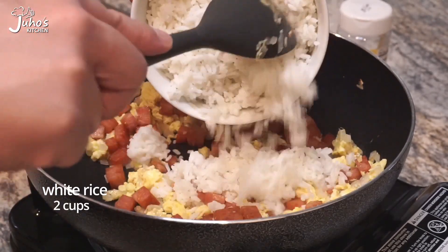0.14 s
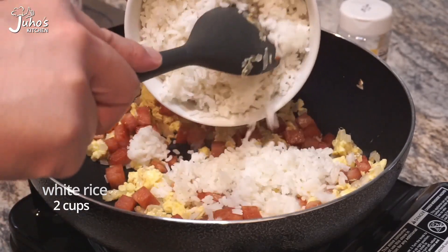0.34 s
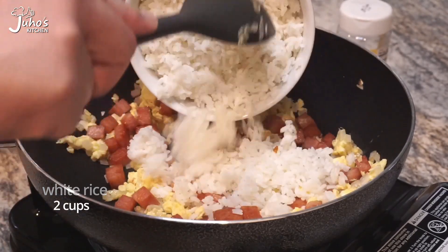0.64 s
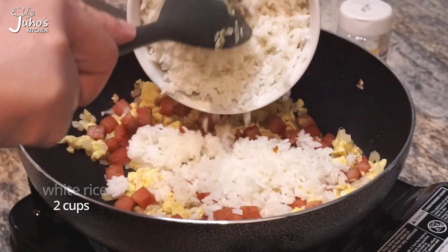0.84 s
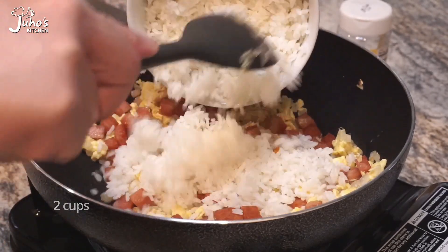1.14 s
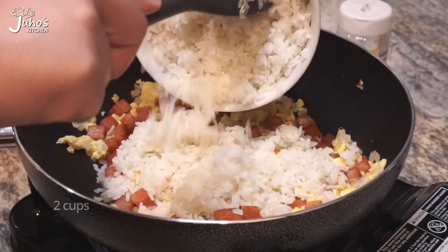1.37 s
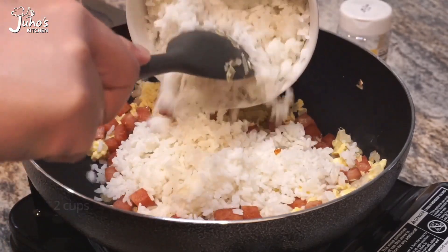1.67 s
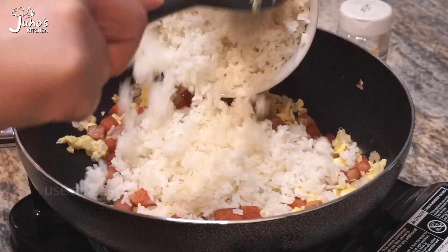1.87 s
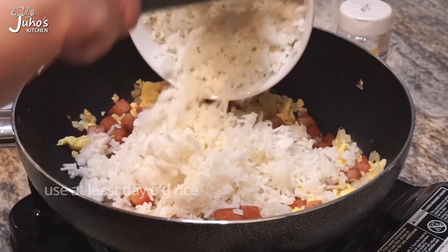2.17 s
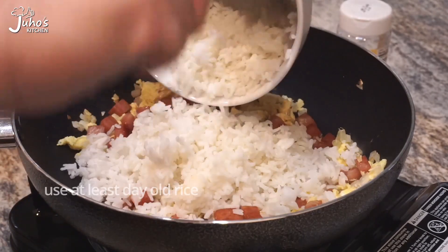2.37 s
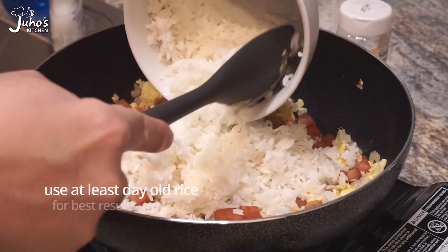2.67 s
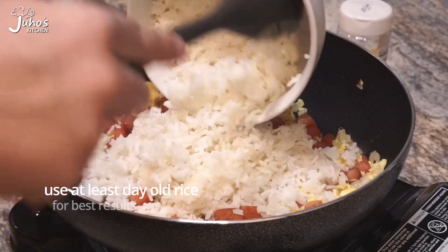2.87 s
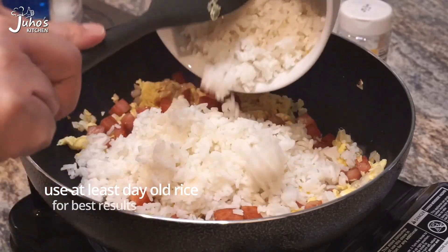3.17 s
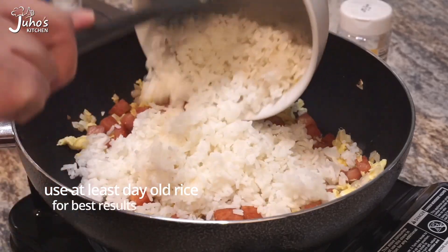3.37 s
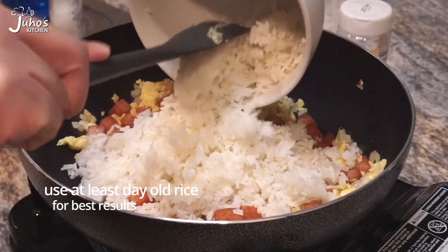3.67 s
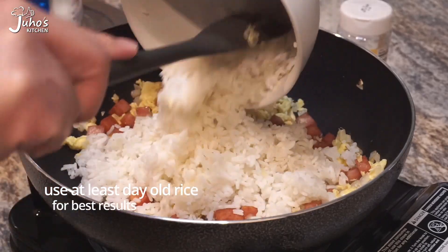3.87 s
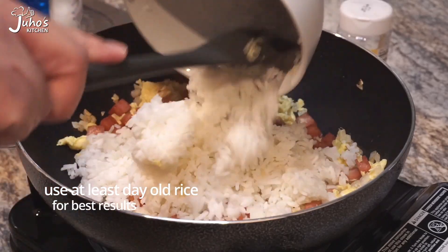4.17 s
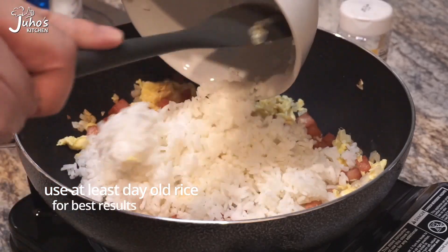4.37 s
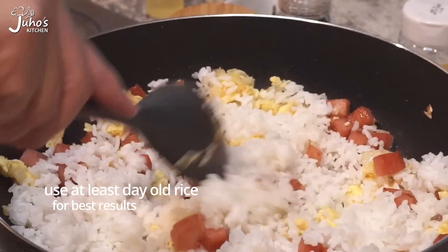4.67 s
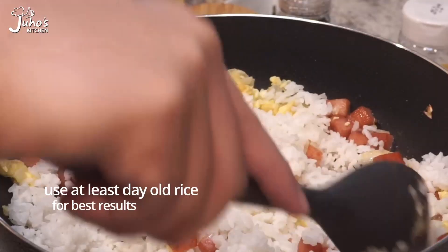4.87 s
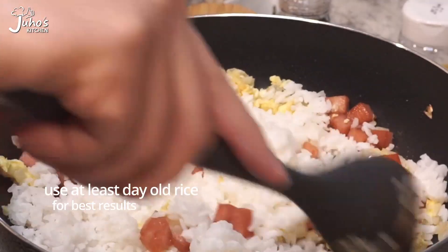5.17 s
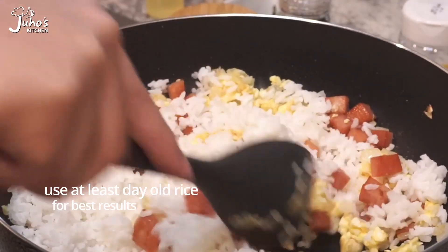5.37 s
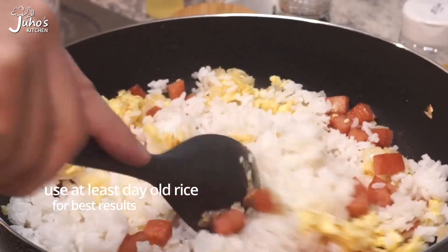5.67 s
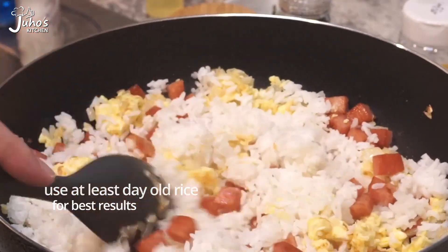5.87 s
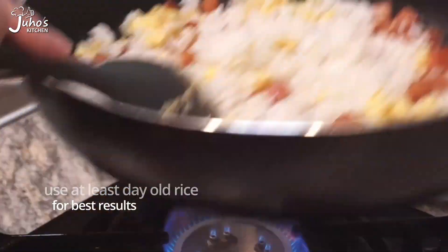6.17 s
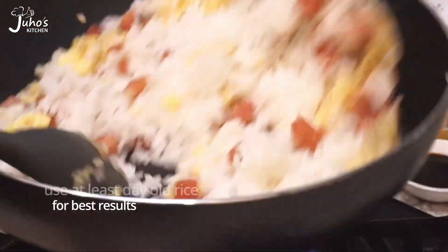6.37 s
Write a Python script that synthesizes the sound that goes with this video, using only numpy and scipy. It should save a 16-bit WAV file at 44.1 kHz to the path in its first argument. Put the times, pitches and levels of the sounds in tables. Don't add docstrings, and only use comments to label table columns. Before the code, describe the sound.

Food sizzles and crackles in a wok on a gas flame, popping oil, then hisses louder as it is turned, with sharp spatula knocks near the end.

```python
import sys
import numpy as np
from scipy import signal
from scipy.fft import rfft, irfft, next_fast_len
from scipy.io import wavfile

SR = 44100
rng = np.random.default_rng(int(sys.argv[2]) if len(sys.argv) > 2 else 0)


def ratio(d):
    e = np.asarray(d, float) / 20
    return 10 ** e


def wav_record(signal):
    frames = np.transpose(np.atleast_2d(signal))
    bounded = np.clip(frames, -1, 1)
    quanta = np.round(bounded * 32767).astype(np.int16)
    wavfile.write(sys.argv[1], SR, quanta)


N = 287532
TURN_S = 4.64

# frequency_hz, density_db
FIZZ_SPECTRUM = [(880, -34), (1500, -2), (1900, 0), (2590, -3), (3530, -0.5), (6600, 0.5), (8780, -1.5),
                 (10500, -12.5), (13600, -30), (22000, -120)]
# frequency_hz, density_db
SIMMER_SPECTRUM = [(240, -29), (400, -12), (611, -1), (774, -3), (1140, 6), (1700, -6), (2210, -16),
                   (3740, -120)]
# frequency_hz, density_db
SPRAY_SPECTRUM = [(5600, -21), (9500, -4), (10800, -6.5), (13000, 0), (15000, -0.5), (17000, -2)]
# centre_hz, width_hz, boost_db
BOWL_RESONANCES = [
    (571, 210, 4.5),
    (1160, 180, 0.5),
    (2543, 620, 5.5),
    (6700, 720, 2.5),
]


def sizzle():
    t = np.arange(N) / SR
    turned = t > TURN_S
    stroke_db = stroke_swells()
    swing_db = stroke_db + 6.5 * turned
    crackle = bursts(per_s=1500, spread_db=3.0, cycles=5.4, clump_db=3.0, splutter_db=9.5, most_db=17)
    hiss = rng.standard_normal(N) * ratio(0.86 * drift(6))

    fizz = colour(hiss + ratio(-2.5) * crackle, FIZZ_SPECTRUM, BOWL_RESONANCES)
    simmer = colour(hiss + ratio(-2.5) * crackle, SIMMER_SPECTRUM, BOWL_RESONANCES)
    spray = colour(hiss + ratio(-0.5) * crackle, SPRAY_SPECTRUM, [(11700, 500, 3.5)])

    toss_db = -8 * np.exp(-((t - 6.25) / .08) ** 2)
    spray = spray - (1 - ratio(toss_db)) * band(spray, 10000, 18000)

    fizz_db = -49 + swing_db
    simmer_db = -58.5 - 0.06 * t + 0.71 * swing_db
    spray_db = -54 - 0.56 * t + 10 * turned + stroke_db
    return ratio(fizz_db) * fizz + ratio(simmer_db) * simmer + ratio(spray_db) * spray


# centre_s, swell_db, half_width_s
STROKES = [(.8, -1, 0.38), (1.35, 0, 0.43), (1.18, 3, .03), (1.57, 1.5, 0.043), (2.17, 2, 0.02),
           (3.1, -2, 0.048), (3.8, -0.5, 0.22), (4.73, 3, 0.041), (4.86, 5, 0.072), (4.96, 4.5, 0.055),
           (5.09, 4, 0.039), (5.25, 4, 0.095), (5.54, 6, .07), (5.77, 4.5, 0.038), (5.85, 3, 0.048),
           (5.97, 2.5, 0.11), (6.19, 4, 0.046), (6.29, -4, 0.043), (6.37, -1, 0.054), (6.52, 4, 0.064)]


def stroke_swells():
    t = np.arange(N) / SR
    return sum(db * np.exp(-((t - centre_s) / half_s) ** 2) for centre_s, db, half_s in STROKES)


def bursts(per_s, spread_db, cycles, clump_db, splutter_db, most_db):
    sizes = ratio(spread_db * np.minimum(rng.exponential(1, N), 3)) * rng.choice([-1, 1], N)
    crowding_db = np.minimum(clump_db * drift(12) + splutter_db * drift(90), most_db)
    born = rng.random(N) < per_s * ratio(crowding_db) / SR
    clicks = sizes * born
    pitches_hz = np.geomspace(450, 17000, 18)
    dealt = rng.integers(0, 18, N)
    out = np.zeros(N)
    for k, hz in enumerate(pitches_hz):
        out += hz ** 0.9 * ring(clicks * (dealt == k), hz, cycles / hz)
    return rms_one(out)


def pops():
    ms = np.arange(round(.014 * SR)) * 1000 / SR
    rows = all_pops()
    splatters = rng.standard_normal((len(rows), len(ms))) ** 3
    out = np.zeros(N + len(ms))
    for (start_s, bowl_db, thump_db, spray_db, hz, length_ms), splatter in zip(rows, splatters):
        kicks = splatter * np.exp(-(ms / (1.4 * length_ms)) ** 2) * length_ms * .27
        kicks[0] = 3
        bowl = per_ms(band(kicks, 1900, 3200))
        thump = per_ms(band(kicks, 650, 1750))
        skin = per_ms(band(kicks, hz / 1.34, hz * 1.3))
        spray = skin + ratio(-1.0) * per_ms(band(kicks, 3100, 2.23 * hz))
        spray = per_ms(spray)
        pop = ratio(bowl_db - 2.26) * bowl - ratio(thump_db + 1.0) * thump - ratio(spray_db + 0.15) * spray
        out[round(start_s * SR):][:len(ms)] -= pop
    return out[:N]


# start_s, bowl_db, spray_db, spray_hz
ROUND_POPS = [(.1402, -32.5, -31.5, 6700), (0.2728, -32.5, -34, 7000), (0.3642, -35, -38, 5200),
              (0.6917, -34, -32, 8300), (1.1507, -38.5, -35.5, 8100), (1.6089, -33.5, -44, 4600),
              (1.6931, -42, -29, 8000), (2.4487, -41, -33.5, 4500), (2.4888, -36, -45, 6200),
              (3.0161, -34.5, -39, 6900), (3.2563, -30, -37.5, 7800), (3.3912, -30, -33.5, 4300),
              (3.483, -34, -31.5, 4600), (3.5534, -40, -36, 5500), (3.9448, -39, -38, 6400),
              (4.0952, -36.5, -34, 7900), (4.4429, -47, -37, 10000), (4.4726, -37, -40, 6800),
              (4.4828, -37, -42, 6900), (4.5993, -32, -40, 4000), (4.7976, -34.5, -28.5, 5500),
              (4.8605, -35, -32, 4500), (4.9494, -35, -34, 4000), (5.1807, -34.5, -35, 6100),
              (5.2506, -32, -27, 6900), (5.4965, -34, -30.5, 7800), (5.516, -37, -33, 7600),
              (5.6529, -33, -35, 6300), (5.8946, -18, -23, 5740), (6.0352, -38, -27.5, 6900)]
# start_s, thump_db, spray_db, spray_hz
DEEP_POPS = [(.4377, -39, -36, 6600), (1.0429, -38.5, -31.5, 6400), (1.3013, -41, -37.5, 4700),
             (1.3062, -39, -38, 5100), (1.4845, -45, -35, 8300), (1.8099, -40.5, -38, 6900),
             (1.8728, -37.5, -44, 7600), (1.8797, -45, -32.5, 6900), (1.8897, -36.5, -34.5, 7600),
             (2.0739, -39.5, -29.5, 7000), (2.243, -36.5, -29.5, 5500), (2.3351, -41.5, -35, 6600),
             (2.607, -46, -29.5, 7800), (2.8086, -34, -31, 5400), (2.8428, -42, -38, 4200),
             (2.9328, -37.5, -33, 6800), (3.3407, -38, -36, 7250), (3.3567, -47, -45, 6100),
             (3.6423, -39.5, -34.5, 4100), (4.2159, -42, -34, 7000), (4.5547, -42.5, -39, 7800),
             (4.7548, -50, -28.5, 6000), (5.0695, -37.5, -29, 8400), (5.1143, -32, -25, 7000),
             (5.4428, -40, -30.5, 5200), (5.4779, -41, -33, 8500), (6.09, -50, -33, 6900),
             (6.2118, -35.5, -38, 6300)]
# start_s, bowl_db, spray_db, spray_hz, length_ms
SPLUTTERS = [(.238, -54, -35.5, 7500, 2.1), (.6264, -40, -43, 4200, 1.3), (1.9424, -29, -33.5, 4700, 1.5),
             (2.2784, -46, -36, 5200, 1.7), (2.5172, -36, -36.5, 6500, 1.2), (2.6137, -46, -36, 6700, 1.7),
             (4.1402, -33.5, -37.5, 6300, 1.9), (4.1454, -40, -40, 9300, 2.4),
             (4.4141, -30.5, -28, 4870, 2), (4.6597, -45, -31, 6800, 1.7), (4.6799, -28, -29, 6600, 1.4),
             (4.7841, -48, -33, 5400, 2), (4.8785, -26.5, -29, 6900, 1.5), (5.3471, -34.5, -29, 8800, 2.2),
             (5.7715, -35, -29, 5200, 1.6), (5.8475, -25.5, -28, 6800, 6.3), (5.8522, -30, -34, 7900, 2),
             (6.0186, -30, -30.5, 7100, 1.1)]
# start_s, spray_db, spray_hz
TICKS = [(.1901, -40, 6700), (0.2225, -37, 7100), (0.5667, -39, 5500), (1.366, -35, 7700),
         (1.3903, -33, 7200), (1.7385, -36.5, 6100), (1.868, -35, 8500), (2.0066, -37, 7800),
         (2.2281, -38, 8200), (2.2534, -35, 7600), (2.342, -34.5, 7000), (2.5496, -36, 6300),
         (2.6541, -36, 6600), (2.7945, -37, 7600), (2.9914, -41, 9800), (3.1652, -35.5, 6900),
         (3.3075, -40, 6800), (3.4383, -36, 8200), (3.6054, -36, 8950), (3.6548, -39, 4800),
         (3.9096, -35.5, 6800), (4.0234, -35, 7000), (4.2227, -36.5, 8800), (4.5209, -37, 9200),
         (4.775, -32, 6400), (4.9849, -32, 8600), (5.1343, -30, 6300), (5.4493, -33, 6000),
         (5.983, -32, 7100), (6.1038, -32.5, 6800)]


def all_pops():
    strays_per_s, stray_db, tick_ms = 4.5, -40, .4
    strays = rng.random((round(strays_per_s * N / SR), 4))
    rows = [(s, db, db - 7.5, top, hz, .4) for s, db, top, hz in ROUND_POPS]
    rows += [(s, db - 5.5, db, top, hz, .55) for s, db, top, hz in DEEP_POPS]
    rows += [(s, db, db - 11.5, top, hz, ms) for s, db, top, hz, ms in SPLUTTERS]
    rows += [(s, top - 16, top - 21, top, hz, tick_ms) for s, top, hz in TICKS]
    rows += [(when * N / SR, stray_db - 16 * a, stray_db - 7 - 14 * b, stray_db, 4400 + 4000 * c, tick_ms)
             for when, a, b, c in strays]
    return rows


# start_s, peak_db, rub_s, spot_hz (place struck), grating_db
KNOCKS = [(.545, -42, 0.0051, 626, -10), (.574, -44, .006, 626, -10), (.669, -42, 0.0009, 1000, -1.5),
          (1.300, -38, 0.0028, 1100, -10), (1.871, -39.5, 0.0042, 700, -8), (5.539, -28.5, 0.0025, 700, -2),
          (5.848, -31, .02, 404, 4), (.63, -44, 0.0069, 590, -10), (.70, -46, 0.012, 590, -10),
          (.79, -48.5, .01, 590, -10), (1.05, -44.5, 0.012, 590, -10), (1.315, -46, 0.0073, 550, -8),
          (1.98, -43.5, 0.0079, 604, -2), (1.21, -49, .02, 600, -8), (2.745, -45, .004, 900, -6),
          (5.64, -43, 0.028, 590, -8), (5.778, -33, 0.017, 260, 3), (5.85, -34.5, 0.033, 198, 4),
          (5.7766, -22.5, .003, 1190, -4), (5.7763, -27.5, 0.0031, 513, -7),
          (5.800, -34.5, 0.0082, 700, -7), (5.842, -26.5, 0.0063, 696, 2), (5.856, -28, 0.011, 990, 1),
          (5.895, -29, .004, 383, -6)]
# frequency_hz, level_db, t60_s
WOK_MODES = [(290, -3, .1), (400, -8, .06), (510, -1, .07), (590, -1, .11), (700, -3, .05), (830, -4, .05),
             (1000, -1, .07), (1150, 2, .1), (1580, -1, .06), (2000, -1, .04), (2340, -1, .05),
             (2620, -3, .04)]


def knocks():
    t = np.arange(round(.2 * SR)) / SR
    out = np.zeros(N + SR)
    grits = rng.standard_normal((len(KNOCKS), len(t)))
    for (start_s, peak_db, rub_s, spot_hz, grating_db), grit in zip(KNOCKS, grits):
        touch = grit * np.exp(-t / max(rub_s, .0005))
        sound = ratio(grating_db + 4) * band(touch, 0.17 * spot_hz, 1.9 * spot_hz)
        for hz, level_db, t60_s in WOK_MODES:
            mode = ring(touch, hz, t60_s)
            octaves_away = abs(np.log2(hz / spot_hz))
            sound += ratio(level_db - 8 * octaves_away) * mode / np.max(np.abs(mode))
        low_hz = spot_hz * 0.53
        sound = band(band(sound, low_hz, 9000), low_hz, 16000)
        out[round(start_s * SR):][:len(t)] += ratio(peak_db - 8) * sound
    return out[:N]


# start_s, length_s, pitch_hz, level_db
SQUEAKS = [
    (.556, .02, 5500, -46),
    (.622, .016, 4100, -50),
]


def squeak():
    t = np.arange(N) / SR
    out = np.zeros(N)
    for start_s, length_s, hz, db in SQUEAKS:
        swell = np.sin(np.pi * np.clip((t - start_s) / length_s, 0, 1)) ** 2
        out += ratio(db) * swell * np.sin(2 * np.pi * hz * t)
    return out


# frequency_hz, density_db
FLAME_SPECTRUM = [(53, -36), (90, -0.5), (182, -3), (237, -2.5), (444, -13), (524, -12.5), (600, -17),
                  (780, -33), (1320, -120)]
# frequency_hz, density_db
GUST_SPECTRUM = [(8.8, -17), (15, 2), (38, 1.5), (70, -2), (130, -10.5), (170, -30), (290, -120)]
# time_s, level_db
DRAUGHT = [(0.0, -52.5), (1.0, -64), (1.16, -49.5), (1.61, -65), (2.12, -54), (2.42, -64.5), (4.59, -62),
           (4.65, -47), (4.74, -55.5), (5.01, -50), (5.12, -65), (5.19, -41), (5.28, -52.5), (5.79, -53.5),
           (5.87, -40), (6.08, -56.5), (6.5, -58.5), (6.52, -71)]


def flame():
    t = np.arange(N) / SR
    roar = ratio(-61.5 + 2 * (t > TURN_S)) * colour(rng.standard_normal(N), FLAME_SPECTRUM)
    gusts = colour(rng.standard_normal(N), GUST_SPECTRUM, [(67, 8.2, 11.6)])
    times_s, levels_db = np.transpose(DRAUGHT)
    return roar + ratio(np.interp(t, times_s, levels_db)) * gusts


# delay_s, level_db
RIM_ECHOES = [
    (.00045, -36.5),
    (.0009, -47),
    (.0016, -18),
    (.0042, -23.5),
    (.0065, -33),
]


def rim(x):
    out = x.copy()
    sign = -1
    for delay_s, db in RIM_ECHOES:
        lag = round(delay_s * SR)
        out[lag:] += sign * ratio(db) * x[:N - lag]
        sign = -sign
    return out


def kitchen(x):
    t = np.arange(round(.4 * SR)) / SR
    dulled = signal.lfilter([1], [1, -.5], rng.standard_normal(len(t)))
    tail = dulled * ratio(-60 * t / 0.26) * (t > .003)
    return signal.fftconvolve(x, tail / np.sqrt(np.sum(tail ** 2)))[:N]


def rms_one(x):
    return x / np.sqrt(np.mean(x ** 2) + 1e-20)


def per_ms(x):
    return x * np.sqrt(SR / 1000 / np.sum(x ** 2))


def drift(rate_hz):
    r = np.exp(-2 * np.pi * rate_hz / SR)
    return rms_one(signal.lfilter([1], [1, -2 * r, r * r], rng.standard_normal(N + SR))[SR:])


def band(x, low_hz, high_hz):
    edges_hz = [low_hz, min(high_hz, .45 * SR)]
    return signal.sosfilt(signal.butter(2, edges_hz, "band", fs=SR, output="sos"), x)


def ring(clicks, hz, t60_s):
    r = ratio(-60 / (t60_s * SR))
    w = 2 * np.pi * hz / SR
    return signal.lfilter([0, np.sin(w)], [1, -2 * r * np.cos(w), r * r], clicks + 1e-18)


def colour(x, spectrum, peaks=()):
    size = next_fast_len(N + SR)
    hz = np.maximum(np.arange(size // 2 + 1) * SR / size, 1)
    points_hz, points_db = np.transpose(spectrum)
    db = np.interp(np.log(hz), np.log(points_hz), points_db)
    for centre_hz, width_hz, top_db in peaks:
        db = db + top_db / (1 + (2 * (hz - centre_hz) / width_hz) ** 2)
    cepstrum = irfft(np.log(ratio(db)), size)
    cepstrum[1:size // 2] *= 2
    cepstrum[size // 2 + 1:] = 0
    return rms_one(irfft(rfft(x, size) * np.exp(rfft(cepstrum)), size)[:N])


def scene():
    hits = rim(pops()) + knocks() + squeak()
    mix = hits + ratio(-11) * kitchen(hits) + sizzle() + flame()
    return mix[None]


def low_pass(x):
    return signal.sosfilt(signal.butter(12, 16940, fs=SR, output="sos"), x)


def record(dry):
    steep = signal.ellip(12, .5, 45, 15790, fs=SR, output="sos")
    mix = signal.sosfilt(steep, dry)
    return low_pass(mix)


dry = scene()
out = record(dry)
wav_record(out)
```